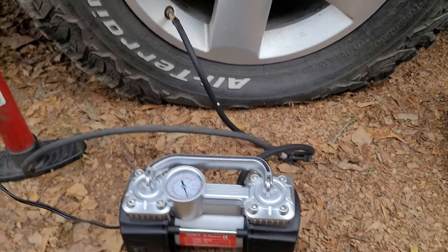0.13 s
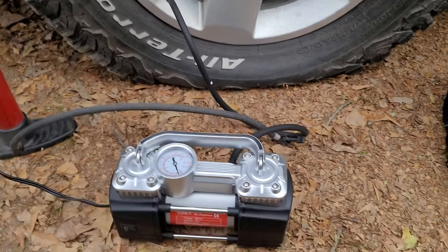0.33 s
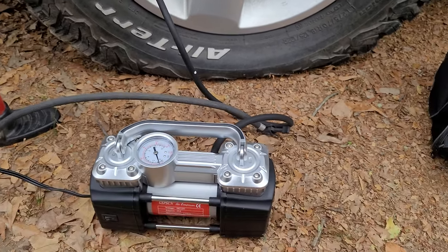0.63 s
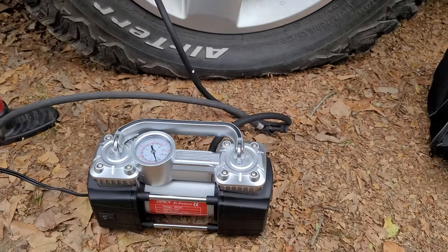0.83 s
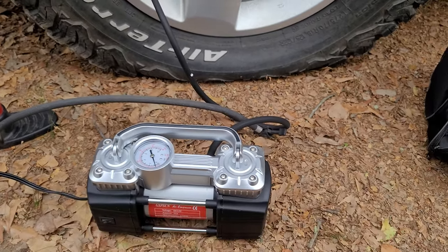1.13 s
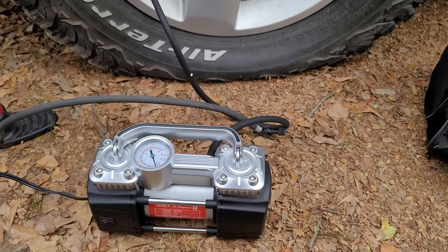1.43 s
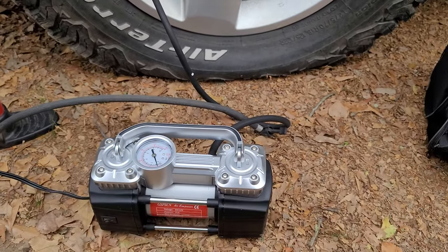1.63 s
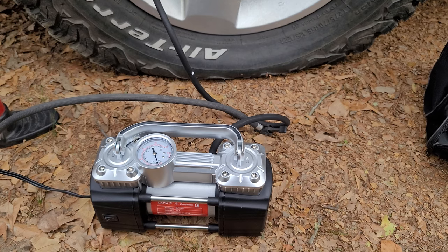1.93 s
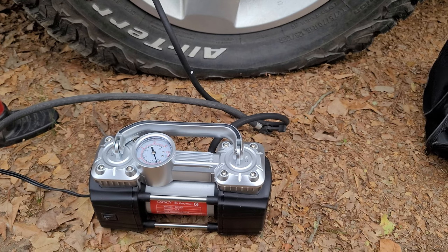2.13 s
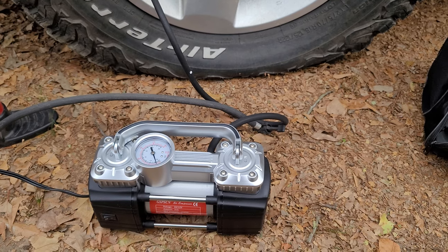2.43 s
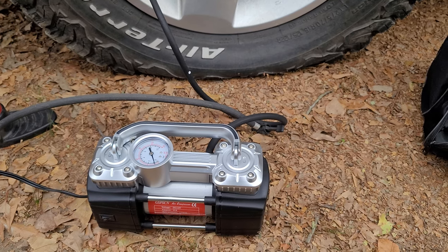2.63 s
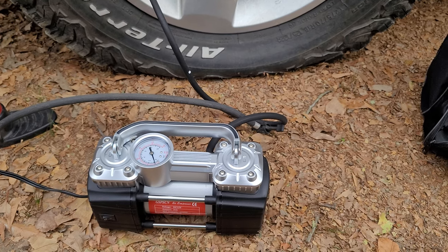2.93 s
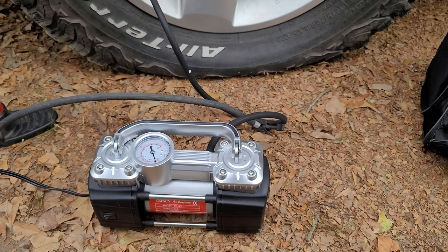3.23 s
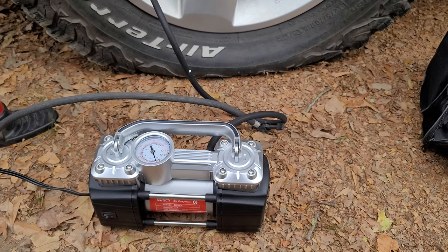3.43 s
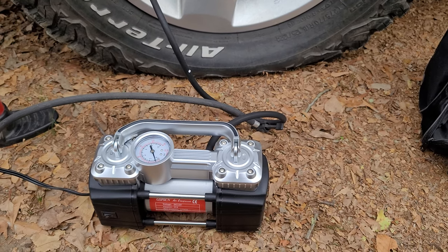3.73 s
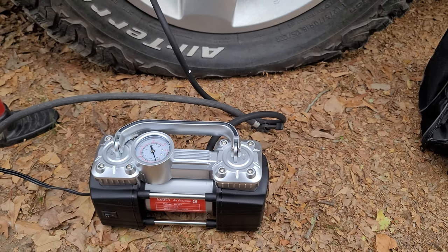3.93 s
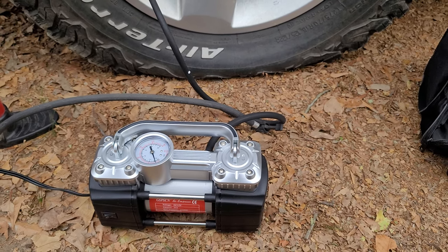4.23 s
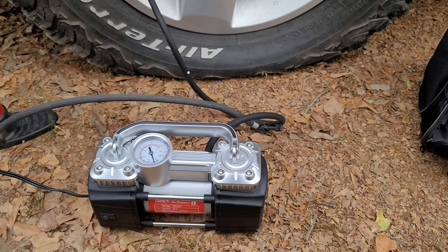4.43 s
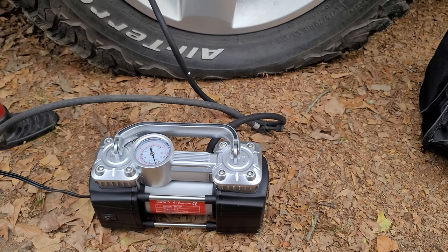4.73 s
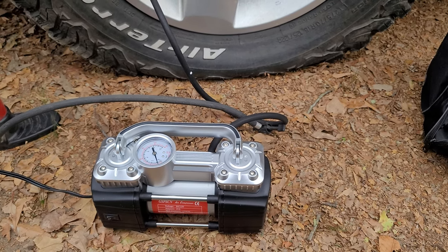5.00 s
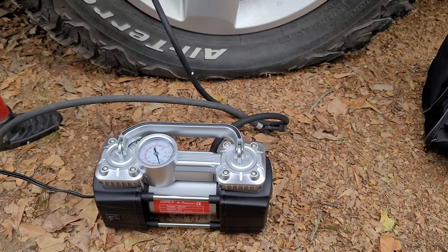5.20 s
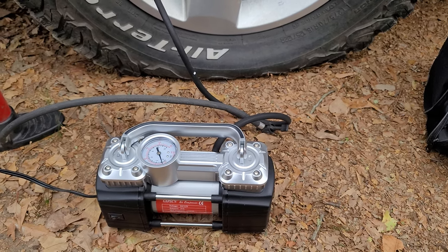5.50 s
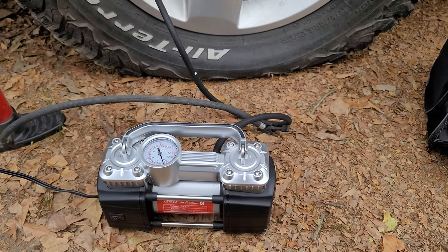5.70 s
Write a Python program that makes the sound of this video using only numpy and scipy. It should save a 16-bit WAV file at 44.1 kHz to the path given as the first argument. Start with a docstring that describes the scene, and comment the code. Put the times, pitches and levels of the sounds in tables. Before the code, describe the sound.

A small portable air compressor is already running close to the microphone, inflating a tire outdoors. Its rapid piston strokes blend into a deep hum and nasal drone, with metallic rattling, scraping and fine, high valve squeals. A thin motor whine grows slightly louder about four seconds in. A distant bird chirps faintly at the start and again near the end, over a low outdoor rumble, as the pump keeps going.

```python
"""A small twin-piston air compressor pumps up a tyre, close by, on bare ground outdoors.
It is already running at the start, while a far-off bird chirps faintly four times. All the way through,
each turn of the crank gives two strokes: they drive a deep hum and a nasal drone, and make the pistons
scrape, the valves squeal and the rods knock in the metal housing. About four seconds in, the motor's thin
whine grows a little louder. Near the end the bird chirps three more times, and the pump runs on."""
import sys
import numpy as np
from scipy import signal
from scipy.fft import rfft, irfft
from scipy.io import wavfile
from scipy.ndimage import uniform_filter1d, map_coordinates

SR = 44100
rng = np.random.default_rng(int(sys.argv[2]) if len(sys.argv) > 2 else 0)


def store_pcm(level_fs):
    """Save levels as 16-bit WAV."""
    pcm = np.round(np.clip(level_fs, -1, 1) * 32767).astype(np.int16)
    wavfile.write(sys.argv[1], SR, np.atleast_2d(pcm).T)


N = 258426
TIME = np.arange(N) / SR

# The distant bird's chirps: start_s, length_s, start_pitch_hz, end_pitch_hz, level_db
BIRD_CHIRPS = [(0.065, 0.051, 4600, 3480, -44), (.184, 0.024, 4200, 4400, -34),
               (.455, 0.049, 4620, 3700, -45), (0.564, 0.035, 4150, 4500, -34),
               (5.406, 0.037, 4350, 3800, -46), (5.512, .032, 4150, 4660, -40),
               (5.77, .045, 4600, 4000, -39)]
# Tone of the outdoor rumble: pitch_hz, level_db
RUMBLE_TONE = [(10, -28), (28, -40), (45, -21), (65, -21), (90, -25), (150, -29.5), (400, -74), (4000, -91)]
# Tone of the air swirling around the intakes: pitch_hz, level_db
RUSH_TONE = [(30, -47), (130, -32.5), (190, -29), (330, -31.5), (450, -35), (540, -35), (640, -22),
             (740, -24), (880, -24.5), (1100, -28.5), (1300, -28), (1500, -35), (2500, -46.5), (8000, -80)]
# How fast the motor turns the crank: time_s, speed_turns_per_s
CRANK_SPEED = [(0.0, 34.721), (0.5, 34.741), (1.3, 34.75), (1.8, 34.816), (2.3, 34.829), (2.6, 34.791),
               (3.2, 34.858), (3.7, 34.807), (4.2, 34.863), (4.6, 34.821), (5.4, 34.831), (5.86, 34.814)]
# The tones of the motor's whine: cycles_per_turn
WHINE_MULTIPLES = (80, 93, 94, 216)
# Strength of each of those tones: left_db, right_db
WHINE_LEVELS = [(-52, -48), (-66, -46.5), (-52.5, -69), (-79, -77)]
# Slow changes in the whine and in the top of the drone: time_s, whine_gain_db, drone_top_gain_db
SLOW_CHANGES = [(0, -4, 3), (.6, -2, 0.8), (2, -2, 0.5), (3.4, -2, 1), (4.2, 3, 0), (4.8, 2, -0.8),
                (5.86, 3, -0.5)]
# Valve squeals, placed by how far round the crank is: angle_turns, spread_turns, pitch_hz, level_db
VALVE_SQUEALS = [(0.274, 0.048, 5650, -25.5), (0.38, 0.012, 6050, -32.5), (.745, 0.03, 6020, -27),
                 (0.879, 0.051, 6107, -25.5), (0.95, 0.019, 5620, -27)]
# How the squeals rise and fall: time_s, gain_db
SQUEAL_GAIN = [(0, -7.5), (.4, -4), (2, -3), (3.2, -4), (4, -4.5), (5.86, -3.5)]
# Hollow clacks of the case around the crank: angle_turns, pitch_hz, width_hz, left_db, right_db
CASE_CLACKS = [(.674, 2665, 190, -31.5, -34.5), (.681, 1777, 203, -45, -31), (.756, 3340, 222, -33, -42.5),
               (0.811, 2035, 440, -26.5, -23.5)]
# How the finest hiss rises and falls: time_s, gain_db
SPIT_GAIN = [(0, -4), (1, 0.5), (2.5, 4), (4, -2), (5.86, -6)]
# Where in a turn the pistons rub hardest: angle_turns, spread_turns, level_db
PISTON_RUBS = [(.3, 0.038, 2), (.42, 0.075, 0), (0.777, 0.038, 5.5), (0.861, 0.028, 5)]
# Knocks of the rods and valves in one turn: angle_turns, level_db
ROD_KNOCKS = [(0.389, 10), (0.678, 15), (.762, 15), (0.823, 18.5), (.853, 20), (.878, 13.5)]
# How the clatter and the clacks rise and fall: time_s, gain_db
CLATTER_GAIN = [(0, 1.5), (.25, 1.5), (.8, 0.5), (2, 0.5), (3.8, 0.43), (4.8, 1.1), (5.86, 1.3)]
# Tone of the metal housing toward the left and toward the right: pitch_hz, gain_db
HOUSING_TONE_LEFT = [(500, -48.5), (1300, -50), (1650, -28.5), (2000, -30), (2300, -35), (3700, -31),
                     (4500, -32.5), (6000, -30.5), (6800, -37), (8300, -35), (9200, -47.5), (11000, -42.5),
                     (12500, -44), (14400, -39), (15700, -41)]
HOUSING_TONE_RIGHT = [(500, -64), (1300, -40.5), (1650, -31.5), (2100, -25.5), (2500, -33.5), (4500, -34),
                      (5500, -26.5), (6300, -25.5), (7300, -34.5), (7800, -44.5), (8900, -54), (10200, -40),
                      (11200, -46.5), (15700, -47.5)]
# Pitches that the housing boosts or weakens: pitch_hz, width_hz, left_db, right_db
HOUSING_RINGS = [(1480, 140, 7.5, -15.5), (1756, 130, 4, 4.5), (1960, 130, 0.5, 2), (2550, 105, 8.5, 5),
                 (2833, 39, 15, -0.5), (3260, 130, 8, -1.5), (3960, 300, 0.5, 5), (5340, 90, -1, 4),
                 (5636, 55, 2, 6.5), (7550, 206, 8, 1), (8080, 190, 5, -11), (12950, 300, 8, 4),
                 (14500, 400, 5, -1)]
# Where in a turn each piston makes its stroke: angle_turns
STROKE_ANGLES = (-.014, .505)
# Hollow spaces in the pump that every stroke thumps: pitch_hz, width_hz, left_db, right_db
THUMP_RINGS = [(147, 92, -28.5, -28), (245.55, 7.2, -45, -46.5), (336, 47.4, -27, -27),
               (489.6, 79, -29, -41)]
# Puffs of air that ring the intakes in one turn: angle_turns, pitch_hz, left_db, right_db
INTAKE_PUFFS = [(.16, 853.5, -15.5, -17), (0.169, 1050, -26, -63), (.269, 779.7, -16, -18),
                (0.338, 746.4, -14, -15.5), (0.352, 940.7, -23.5, -19), (.375, 1138, -31.5, -23),
                (.477, 931.3, -24, -13.5), (0.733, 708, -14, -23.5), (0.787, 883.2, -17.5, -14),
                (0.81, 1225, -27.5, -23.5), (0.988, 629, -13, -15)]


def amp(db):
    """Turns decibels into a number to multiply by."""
    return np.exp(np.asarray(db) * (np.log(10) / 20))


def evened(x):
    """Scales a signal to an average strength (rms) of 1."""
    return x / np.sqrt(np.mean(x ** 2) + 1e-20)


def curve(rows):
    """Joins (time, value) points with straight lines."""
    return np.interp(TIME, *np.transpose(rows))


def wander(rate_hz):
    """Smooth random motion of strength 1, mostly slower than rate_hz."""
    hz = np.fft.rfftfreq(N // 32, 32 / SR)
    slow = evened(irfft(rfft(rng.standard_normal(N // 32)) / (1 + (hz / rate_hz) ** 4)))
    return np.interp(np.arange(N), 32 * np.arange(len(slow)), slow)


def colour(x, tone, rings=(), size=4096):
    """Filters a sound by a tone table, plus narrow peaks or dips (pitch_hz, width_hz, gain_db)."""
    hz = abs(np.fft.fftfreq(size, 1 / SR))
    tone_hz, tone_db = np.transpose(tone)
    shape_db = np.interp(np.log(hz + 1), np.log(tone_hz), tone_db)
    shape_db += sum(db / (1 + (2 * (hz - pitch) / width) ** 2) for pitch, width, db in rings)
    response = np.exp(np.conj(signal.hilbert(np.log(amp(shape_db)))))  # rings after a hit, not before
    taps = np.fft.ifft(response).real
    return signal.oaconvolve(x, taps[:size // 2])[:N]


def pair(a, b, likeness):
    """Makes partly alike left and right channels from two unrelated signals."""
    return np.array([a, likeness * a + np.sqrt(1 - likeness ** 2) * b])


def swell(turns, angle, spread):
    """A smooth rise and fall that comes round at one crank angle."""
    return np.exp(-((turns - angle + .5) % 1 - .5) ** 2 / (2 * spread ** 2))


def below(hz, edge_hz, steepness=12):
    """Close to 1 for pitches under the edge, close to 0 above it."""
    return 1 / (1 + (hz / edge_hz) ** steepness)


def ringing(blows, k, turn_hz):
    """What fading rings, struck once a turn, give to the tone at k times the crank speed."""
    s = 2j * np.pi * k * turn_hz
    total = 0
    for angle, hz, width, *sides_db in blows:
        ring = 2 * np.pi * hz / ((s + np.pi * width) ** 2 + (2 * np.pi * hz) ** 2)
        delay = np.exp(-2j * np.pi * k * angle)
        total += amp(sides_db) * 2 * turn_hz * ring * delay
    return total


def bird(left_db=-8):
    """A bird far off to the right flicks its whistle down or up."""
    out = np.zeros(N)
    for start, length, start_hz, end_hz, db in BIRD_CHIRPS:
        progress = np.clip((TIME - start) / length, 0, 1)
        hz = start_hz + (end_hz - start_hz) * progress
        out += amp(db) * np.sin(np.pi * progress) * np.sin(2 * np.pi * np.cumsum(hz) / SR)
    return np.outer([amp(left_db), 1], out)


def outdoor_rumble(gust_db=2):
    """Low outdoor noise that swells and sinks in slow gusts."""
    sides = [colour(noise, RUMBLE_TONE, size=16384) for noise in rng.standard_normal((2, N))]
    return pair(*sides, likeness=0.5) * amp(gust_db * wander(1.8))


def piston_pressure(turns):
    """How hard the pistons rub at each crank angle."""
    return np.sqrt(1 + sum(amp(db) ** 2 * swell(turns, at, spread) for at, spread, db in PISTON_RUBS))


def intake_rush(turns, pulsing=0.99):
    """Air swirls into the intakes, pulsing with the strokes."""
    pulsed = colour(rng.standard_normal(N) * evened(piston_pressure(turns) ** pulsing), RUSH_TONE)
    steady = colour(rng.standard_normal(N), RUSH_TONE)
    return pair(pulsed, steady, likeness=0.9)


def motor_whine(turns, waver_db=1.0):
    """The motor sings thin, high tones that follow the crank's speed."""
    out = np.zeros((2, N))
    for k, sides_db in zip(WHINE_MULTIPLES, WHINE_LEVELS):
        tone = np.sqrt(2) * np.sin(2 * np.pi * k * turns)
        out += np.outer(amp(sides_db), tone) * amp(waver_db * wander(6.1))
    return out * amp(curve([(s, db) for s, db, _ in SLOW_CHANGES]))


def valve_squeals(turns, left_db=-8):
    """Air forced through the valves makes short, high squeals that start afresh on every turn."""
    out, turn_hz = np.zeros(N), curve(CRANK_SPEED).mean()
    for angle, spread, hz, db in VALVE_SQUEALS:
        from_peak_s = ((turns - angle + .5) % 1 - .5) / turn_hz
        flutter, force_db = .3 * wander(50), wander(30)
        tone = np.sqrt(2) * np.sin(2 * np.pi * hz * from_peak_s + flutter)
        out += amp(db + force_db) * swell(turns, angle, spread) * tone
    return np.outer([amp(left_db), 1], out) * amp(curve(SQUEAL_GAIN))


def case_clacks(turns, scatter_db=.6):
    """Once a turn the load reverses, and the case around the crank gives brief, hollow rings."""
    out, turn_hz = np.zeros((2, N)), curve(CRANK_SPEED).mean()
    for angle, hz, width, *sides_db in CASE_CLACKS:
        since_s = (turns - angle) % 1 / turn_hz
        age = np.pi * width * since_s  # the ring is loudest at age 1
        ring = age * np.exp(1 - age) * np.sin(2 * np.pi * hz * since_s)
        out += np.outer(amp(sides_db), ring) * amp(scatter_db * wander(30) + curve(CLATTER_GAIN))
    return out


def air_spit(turns, above_hz=12000):
    """The harder stroke spits a burst of very fine hiss."""
    treble_only = signal.butter(4, above_hz, "high", fs=SR, output="sos")
    fizz = signal.sosfilt(treble_only, rng.standard_normal((2, N)))
    return amp(curve(SPIT_GAIN)) * fizz * swell(turns, angle=.82, spread=.055)


def piston_scrape(turns, size=1266):
    """The seals pass the same rough wall on every turn, so their scrape repeats."""
    wall = rng.standard_normal(size)
    force = piston_pressure(np.arange(size) / size)
    for _ in range(2):
        wall = irfft(np.exp(1j * np.angle(rfft(wall * force))))  # even strength at all pitches
    return evened(map_coordinates(wall, [turns % 1 * size], order=5, mode="grid-wrap"))


def rod_knocks(turns, looseness_s=.00002):
    """Slightly loose rods and valves click at set angles, each time a touch early or late."""
    out, nearby = np.zeros(N + 32), np.arange(-8, 9)
    for angle, db in ROD_KNOCKS:
        when_s = np.interp(np.arange(turns[-1] - 1) + angle, turns, TIME)
        when_s += looseness_s * rng.standard_normal(len(when_s))
        centre = np.clip(when_s * SR, 8, N)[:, None]
        index = centre.astype(int) + nearby
        clicks = np.sinc(index - centre) * np.hanning(len(nearby))  # can land between samples
        np.add.at(out, index, amp(db) * clicks)
    return uniform_filter1d(out[:N], size=2)  # oiled contacts are slightly blunt


def housing_clatter(turns, scrape_db=-2.0, hiss_db=-4.5, knock_db=-2, likeness=0.053, right_spit_db=-7):
    """Scraping, leaking air and knocks all ring the metal housing."""
    scrape = amp(scrape_db) * pair(piston_scrape(turns), piston_scrape(turns), likeness)
    hiss = amp(hiss_db) * evened(pair(*rng.standard_normal((2, N)), likeness) * piston_pressure(turns))
    knocks = amp(knock_db) * rod_knocks(turns)
    spit = np.array([1, amp(right_spit_db)])[:, None] * air_spit(turns)
    left, right = (scrape + hiss + knocks) * amp(curve(CLATTER_GAIN)) + spit
    left = colour(left, HOUSING_TONE_LEFT, [(hz, width, db) for hz, width, db, _ in HOUSING_RINGS])
    right = colour(right, HOUSING_TONE_RIGHT, [(hz, width, db) for hz, width, _, db in HOUSING_RINGS])
    return np.array([left, right])


def pump_drone(turns, waver_db=0.45, waver_hz=5, unevenness=0.0068, top_from_hz=1100, tone_count=45):
    """Two thumps a turn make the deep hum; puffs ringing in the intakes make the nasal drone."""
    thump_top_hz = 469.5  # the thumps are dull above this
    intake_low_hz, intake_high_hz = 694.6, 1510  # the pitches that the intakes let out
    puff_width_hz = 61.3  # all puffs die away equally fast
    out, turn_hz = np.zeros((2, N)), curve(CRANK_SPEED).mean()
    top_db = curve([(s, db) for s, _, db in SLOW_CHANGES])
    thumps = [(angle, *ring) for angle in STROKE_ANGLES for ring in THUMP_RINGS]
    puffs = [(angle, hz, puff_width_hz, *sides_db) for angle, hz, *sides_db in INTAKE_PUFFS]
    for k in range(1, tone_count + 1):
        hz = k * turn_hz
        hum = ringing(thumps, k, turn_hz) * below(hz, thump_top_hz)
        let_out = (1 - below(hz, intake_low_hz)) * below(hz, intake_high_hz, steepness=24)
        nasal = ringing(puffs, k, turn_hz) * let_out
        tone = np.outer(hum + nasal, np.exp(2j * np.pi * k * turns)).real
        out += tone * amp(waver_db * wander(waver_hz) + top_db * (hz > top_from_hz))
    return out * (1 + unevenness * wander(40))


def scene(start_turns=-.007, tremble_turns=0.0001, right_lag_samples=6):
    """One slightly trembling crank drives every part of the machine; rumble and a bird lie behind it."""
    turns = start_turns + np.cumsum(curve(CRANK_SPEED)) / SR + tremble_turns * wander(51)
    machine = pump_drone(turns) + motor_whine(turns) + housing_clatter(turns)
    machine += case_clacks(turns) + valve_squeals(turns) + intake_rush(turns)
    left, right = machine + outdoor_rumble()
    right = np.interp(TIME - right_lag_samples / SR, TIME, right)  # reaches the right a little later
    return np.array([left, right]) + bird()


def record(dry, top_hz=15850):
    """Cuts away the very highest treble."""
    taps = signal.firwin(511, top_hz, window=("kaiser", 9), fs=SR)
    return signal.oaconvolve(dry, taps[None], "same")


dry = scene()
out = record(dry)
store_pcm(out)
```